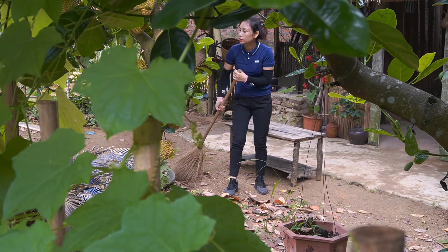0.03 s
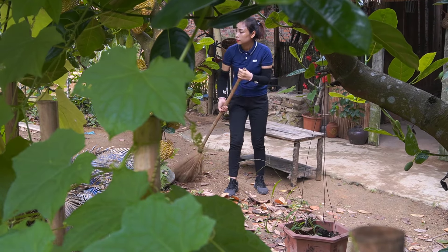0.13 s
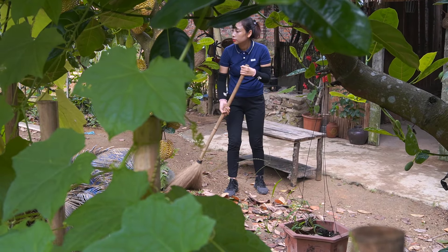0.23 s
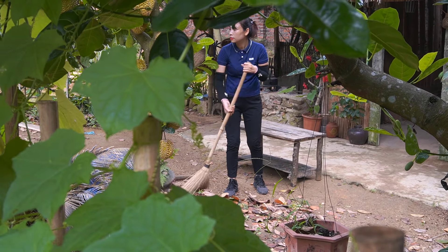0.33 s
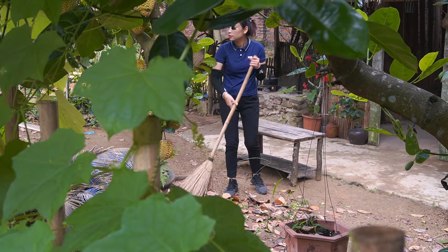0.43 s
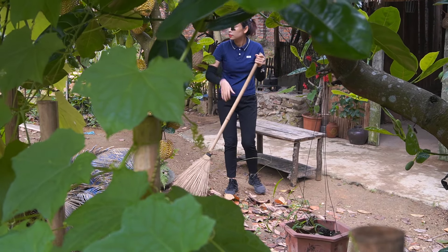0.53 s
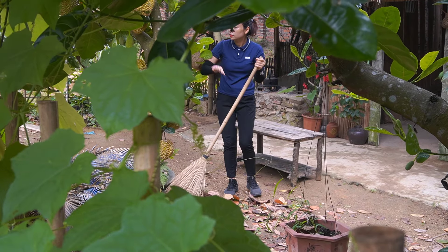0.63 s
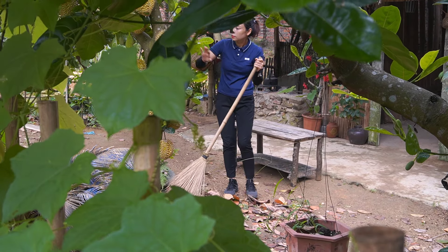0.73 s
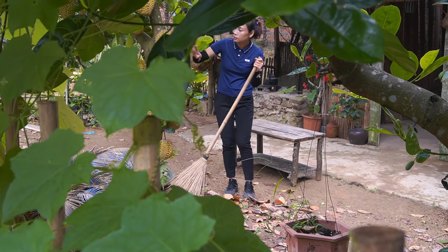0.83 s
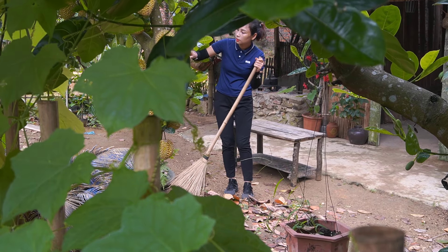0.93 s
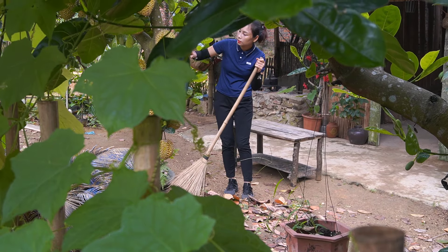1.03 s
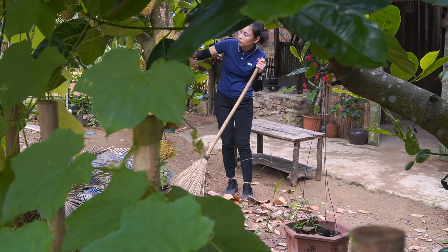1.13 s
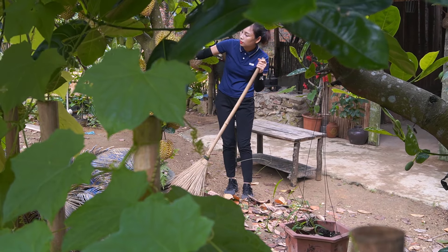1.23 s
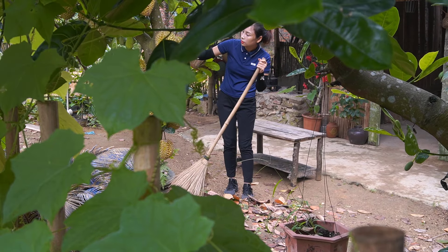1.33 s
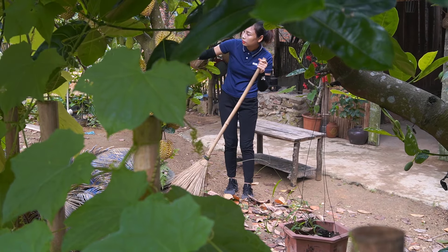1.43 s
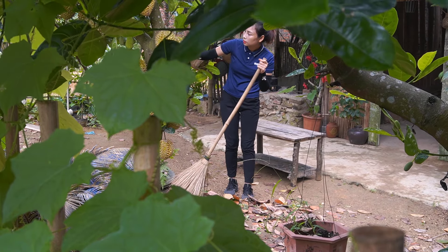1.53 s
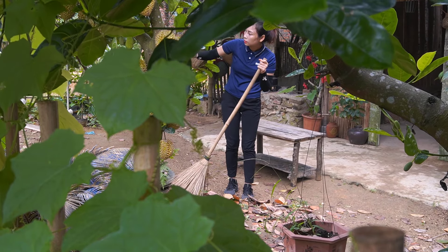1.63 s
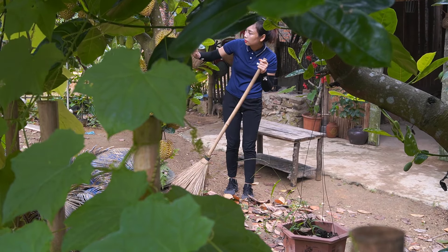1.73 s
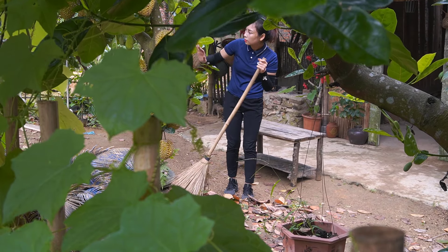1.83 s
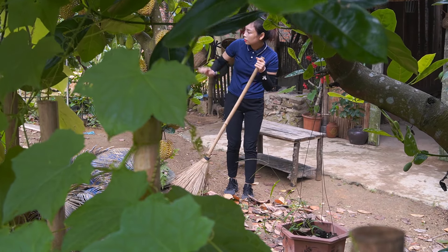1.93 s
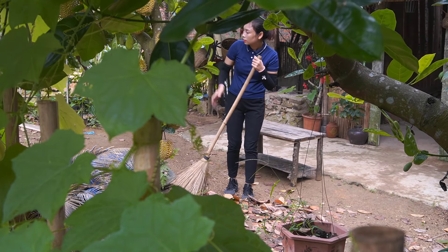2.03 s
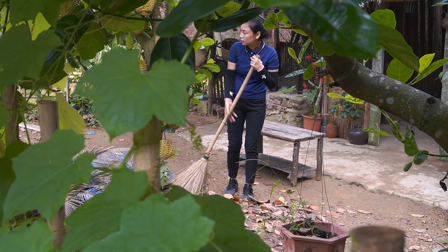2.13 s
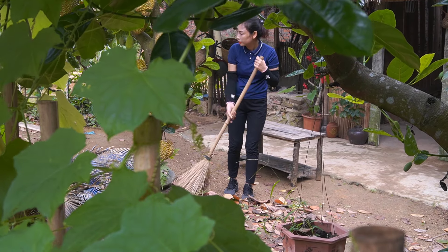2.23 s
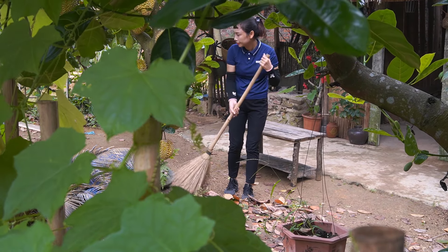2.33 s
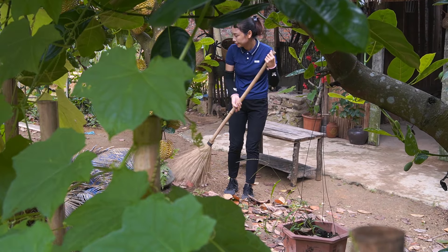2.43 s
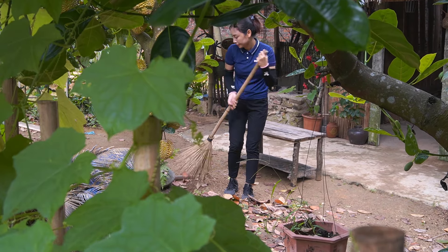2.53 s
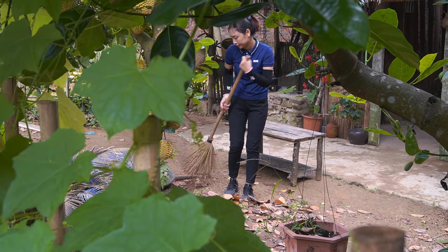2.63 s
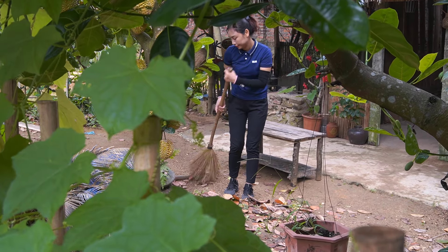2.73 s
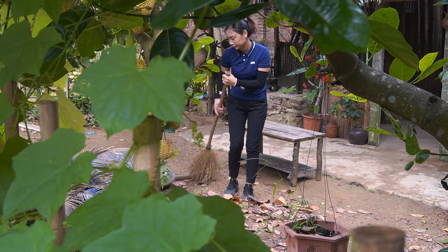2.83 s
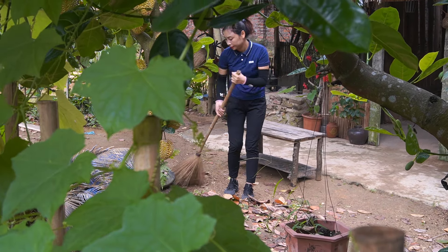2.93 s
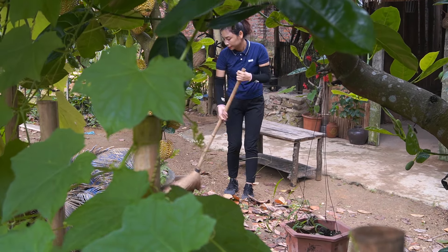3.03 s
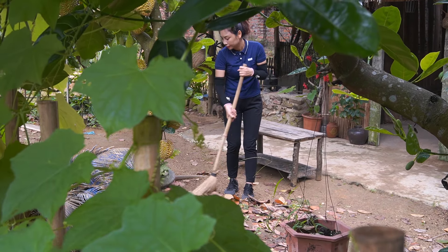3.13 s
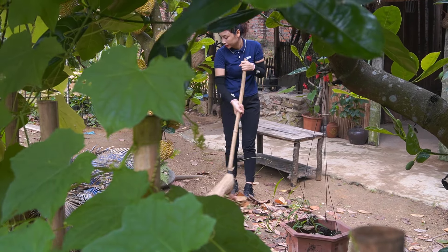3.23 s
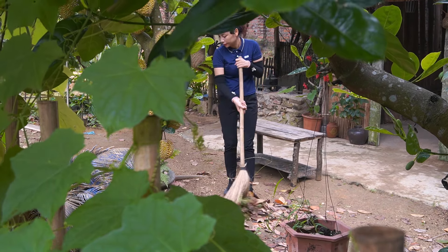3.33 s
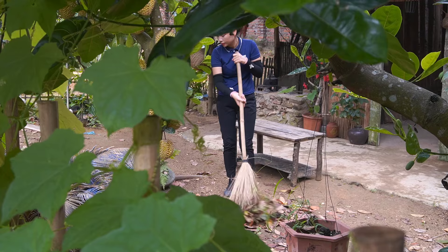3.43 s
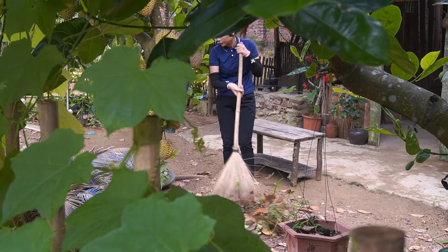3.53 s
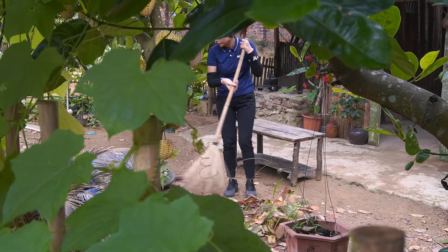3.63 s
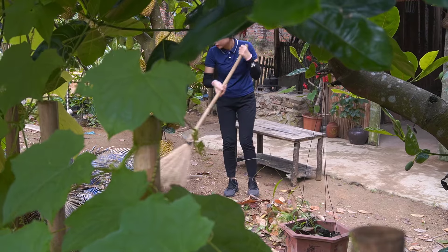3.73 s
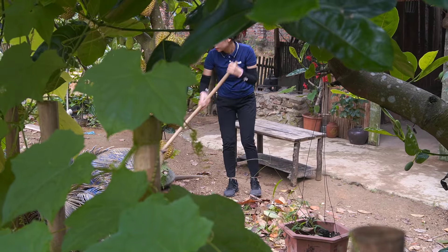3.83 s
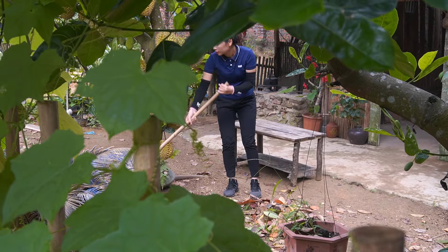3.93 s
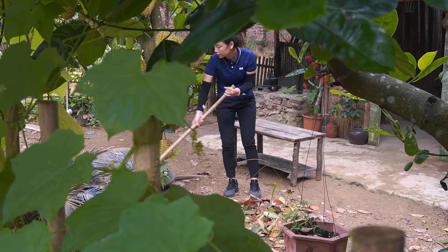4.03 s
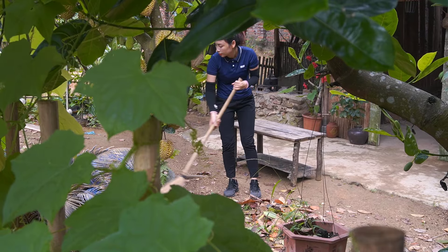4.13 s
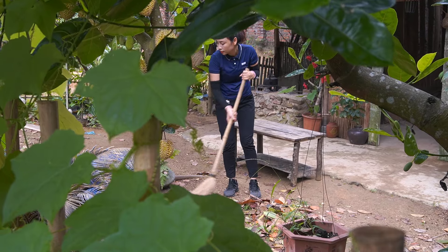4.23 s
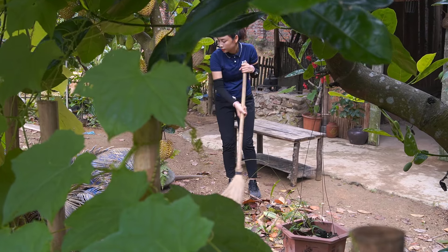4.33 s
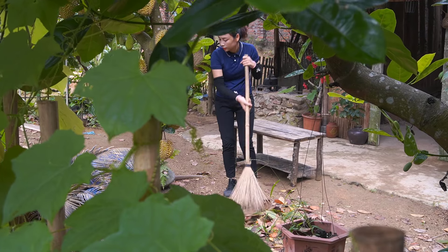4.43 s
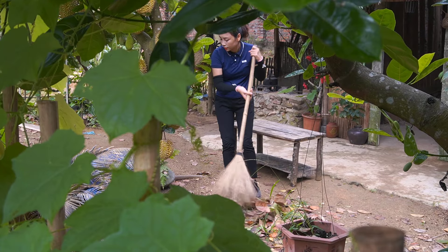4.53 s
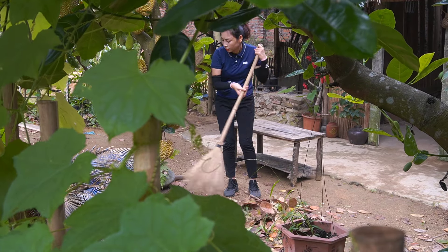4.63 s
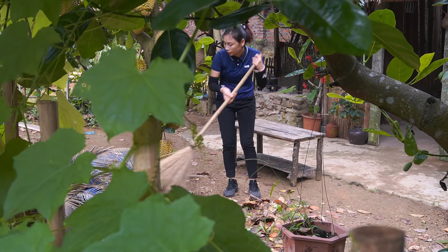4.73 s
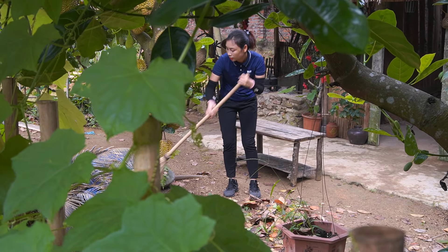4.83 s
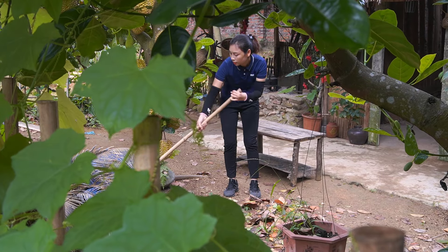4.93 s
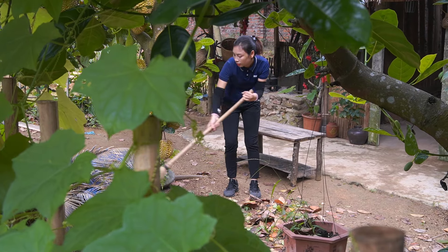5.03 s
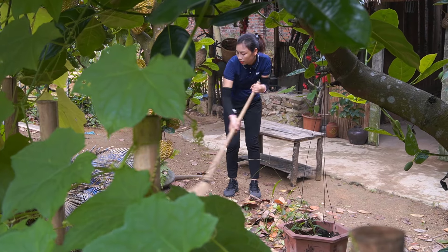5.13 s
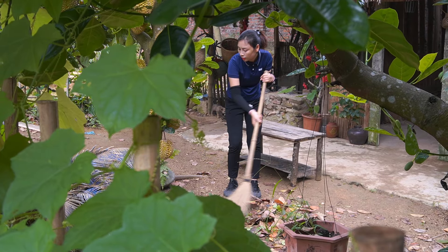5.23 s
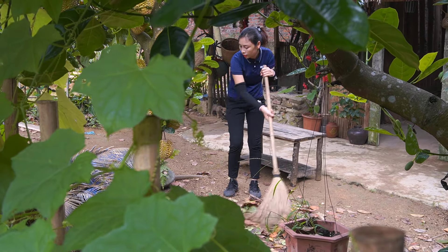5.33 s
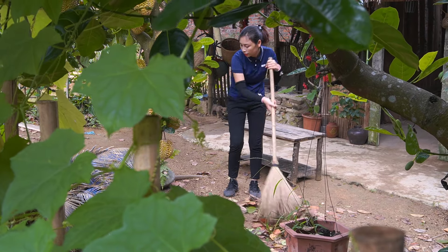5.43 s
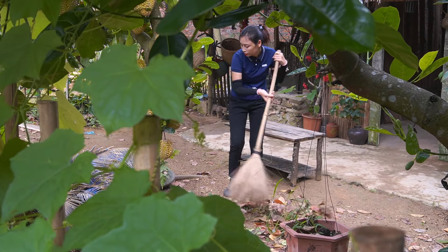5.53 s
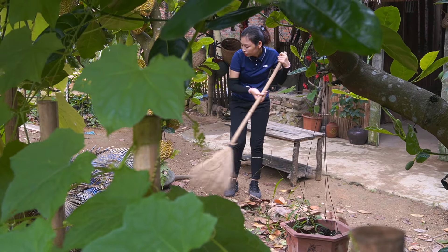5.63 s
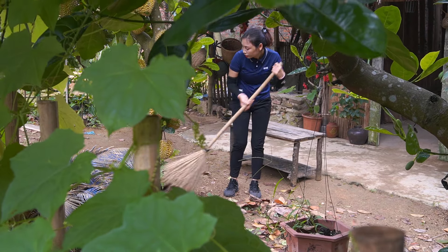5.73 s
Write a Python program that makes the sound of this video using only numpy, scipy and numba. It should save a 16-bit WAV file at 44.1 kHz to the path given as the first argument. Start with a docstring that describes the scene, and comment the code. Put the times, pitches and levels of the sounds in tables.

```python
"""Dry, crackling sweeps of a grass broom over leaves and bare dirt, close by in a garden, in mono.
Each stroke is six bands of random clicks (bristle ticks, leaf crackle) over friction noise.
Behind it, coloured noise and clicks make a cicada chorus, banded grains a faint cricket, short damped
modes the wooden knocks, and noise with low tones the garden air and a far machine's hum.
Gain control ducks everything slightly under the loud strokes."""
import sys
import numpy as np
from scipy import signal
from scipy.fft import rfft, irfft
from scipy.io import wavfile
from scipy.ndimage import uniform_filter1d
from numba import njit

SR = 44100
rng = np.random.default_rng(int(sys.argv[2]) if len(sys.argv) > 2 else 0)


def digitize_waveform(pressure):
    """Quantize a signal to 16-bit integers and store it at the path in sys.argv[1].

    Rows of a 2-D input are taken as channels; values are limited to [-1, 1].
    """
    field = np.atleast_2d(pressure).T
    bounded = np.clip(field, -1, 1)
    quanta = np.round(bounded * 32767).astype(np.int16)
    wavfile.write(sys.argv[1], SR, quanta)


N = 255339
T = np.arange(N) / SR  # time of each sample [s]


def undb(db):
    """Turn dB into an amplitude gain."""
    return 10 ** (np.asarray(db) / 20)


def level(x, db):
    """Scale a signal to an rms level in dB."""
    return x * undb(db) / np.sqrt(np.mean(x ** 2))


def columns(table):
    """Interpolate every column of a time curve to one value a sample."""
    times, *rest = np.transpose(table)
    return [np.interp(T, times, column) for column in rest]


def colour(x, table):
    """Filter causally through (frequency [Hz], gain [dB]) points: minimum phase from the folded cepstrum."""
    size = 16384
    hz, db = np.transpose(table)
    grid_hz = np.maximum(np.arange(size // 2 + 1), 1) * SR / size
    gain_db = np.interp(np.log(grid_hz), np.log(hz), db)
    cepstrum = irfft(np.log(undb(gain_db)))
    cepstrum[1:size // 2] *= 2
    cepstrum[size // 2 + 1:] = 0
    impulse = irfft(np.exp(rfft(cepstrum)))
    return signal.fftconvolve(x, impulse)[:N]


def band(x, lo_hz, hi_hz, order=2):
    """Pass only the band between two frequencies."""
    edges_hz = [lo_hz, min(hi_hz, .45 * SR)]
    return signal.sosfilt(signal.butter(order, edges_hz, "band", fs=SR, output="sos"), x)


def walk(rate):
    """Random wander with spread near 1: values held 1 / rate seconds, smoothed twice."""
    hold = int(SR / rate)
    steps = np.repeat(rng.standard_normal(N // hold + 1), hold)
    return 1.3 * uniform_filter1d(uniform_filter1d(steps, hold), hold)[:N]


def crackle(rate, scatter_db, most=3.9):
    """Clicks at random moments, rate a second; sizes stray up (or down, if negative) by a capped dB."""
    hit = rng.random(N) < rate / SR
    size = np.minimum(rng.exponential(size=N), most)
    swing = np.clip(rng.standard_normal(N), -2, 2)
    return level(hit * undb(scatter_db * size) * swing, 0)


def rings(events, rise_s, t60_s):
    """Sound one damped mode for each (time [s], peak level [dB], pitch [Hz]), swelling before it decays."""
    out, t = np.zeros(N + SR), np.arange(SR // 10) / SR
    shape = (1 - np.exp(-t / rise_s)) ** 2 * np.exp(-np.log(1000) * t / t60_s)
    for s, db, hz in events:
        i = int(s * SR)
        out[i:i + len(t)] += undb(db) * shape / shape.max() * np.sin(2 * np.pi * hz * t)
    return out[:N]


def garden():
    """Air, foliage and far traffic as coloured noise, with a low machine hum and a wavering drone."""
    # tone of the garden air: (frequency [Hz], level per Hz [dB])
    air_spectrum = [(20, -6), (40, -18), (70, -2), (130, -5), (230, -5.5), (300, -8), (500, -13.5),
                    (800, -15), (1400, -13), (2200, -17), (4300, -15.5), (6000, -27.5)]
    hum_hz, drone_hz, drone_width_hz = 30.6, 96, 11
    air = level(colour(rng.standard_normal(N), air_spectrum), -36) * undb(0.2 * walk(6.2))
    hum_phase = 2 * np.pi * np.cumsum(hum_hz * (1 + 0.006 * walk(3.45))) / SR
    hum = level(np.sin(hum_phase), -47.5) * undb(0.46 * walk(3.7))
    # noise in so narrow a band wavers by itself
    drone = band(rng.standard_normal(N), drone_hz - drone_width_hz / 2, drone_hz + drone_width_hz / 2, order=1)
    return air + hum + level(drone, -48.5)


def cicadas(count=12):
    """Tymbals click at their own drifting rates, 7 dB under a noise hiss that blurs them into a chorus."""
    # tone of the chorus: (frequency [Hz], level per Hz [dB])
    chorus_spectrum = [(3600, -40), (4250, -46), (4450, -20), (4950, -11), (5600, -4), (6600, -1.5),
                       (7050, -1.5), (7300, -7.5), (7800, -12.5), (8800, -21.5), (10400, -23.5),
                       (11500, -28.5), (15600, -39)]
    # swell of the chorus: (time [s], level [dB])
    chorus_curve = [(0, -20), (.5, -20.5), (1.5, -21), (2.9, -19.5), (3.6, -20), (4.4, -20.5), (5.79, -20)]
    clicks = np.zeros(N)
    rates = rng.uniform(150, 330, count)  # clicks a second
    for rate, db in zip(rates, 3 * rng.standard_normal(count)):
        turns = np.floor(np.cumsum(rate * (1 + .06 * walk(30)) / SR))
        clicks += undb(db) * np.diff(turns, prepend=0) * rng.standard_normal(N)
    hiss = level(clicks, -7) + rng.standard_normal(N)
    chorus_db = columns(chorus_curve)[0] + 0.28 * walk(24.62)
    return level(colour(hiss, chorus_spectrum), 0) * undb(chorus_db)


def cricket():
    """Faint scratchy chirps in one wing resonance, quick to start and slow to fade."""
    # chirps: (time [s], peak level [dB])
    chirp_list = [(.9, -49), (1.14, -42), (1.48, -42), (1.78, -42.5), (2.07, -43.5), (2.28, -56),
                  (2.68, -41)]
    wing_hz, width_hz = 3240, 350
    rise_s, fade_s = 0.023, 0.2  # exponential time constants
    scrape = band(crackle(3000, scatter_db=-4.5), wing_hz - width_hz / 2, wing_hz + width_hz / 2)
    chirps = 0
    for s, db in chirp_list:
        distance = np.where(T < s, (s - T) / rise_s, (T - s) / fade_s)
        chirps = chirps + undb(db) * np.exp(-distance)
    return level(scrape, 0) * chirps


def knocks():
    """Soft hollow wooden knocks, each one or more strongly damped modes."""
    # modes, close rows belonging to one blow: (time [s], peak level [dB], pitch [Hz])
    knock_modes = [(1.2405, -25.5, 557), (1.2415, -25, 390), (1.263, -27, 345), (1.4455, -17.5, 484),
                   (1.675, -31.5, 460)]
    return rings(knock_modes, rise_s=.012, t60_s=.02)


def landings():
    """The broom head meets the ground and sounds all its damped modes at once."""
    # blows: (time [s], level before the mode's own [dB])
    blows = [(2.787, -23.5), (2.986, -25), (3.941, -29)]
    # modes of the broom head: (frequency [Hz], relative level [dB])
    head_modes = [(333, -4), (650, -1), (850, 2), (1150, -2), (1530, -2)]
    events = [(s, db + mode_db, hz) for s, db in blows for hz, mode_db in head_modes]
    return rings(events, rise_s=.004, t60_s=0.015)


def snaps():
    """Single leaves and twigs snap: very fast, damped modes."""
    # snaps: (time [s], peak level [dB], pitch [Hz])
    snap_list = [(2.788, -26, 3120), (4.893, -30, 1260), (5.646, -29, 1590), (5.758, -26, 3460)]
    return rings(snap_list, rise_s=0.00035, t60_s=0.018)


def rasps():
    """Bundles of bristles scrape in step and pitch the swish for a moment: grains in a narrow band."""
    # rasps: (centre time [s], level at the centre [dB], pitch [Hz], half length [s])
    rasp_list = [(.42, -25, 4000, .05), (3.072, -20, 3860, .06), (4.378, -19.5, 3470, 0.079),
                 (5.224, -26, 3600, 0.045), (5.34, -21.5, 2140, 0.036)]
    half_width = 0.29 / 2  # share of the pitch
    grains = crackle(6000, scatter_db=1.0)
    out = 0
    for s, db, hz, half_s in rasp_list:
        rasp = level(band(grains, hz * (1 - half_width), hz * (1 + half_width)), db)
        out = out + rasp * np.exp(-((T - s) / half_s) ** 2)
    return out


def motion(zone_db, tilt, swish, scrape, rest_db):
    """Gain of one zone: strokes bite, drag, fade and settle; touches are brief bumps; powers add."""
    # sweeps: (landing time [s], bite [s], time down [s], level [dB], change while down [dB],
    # brightness at landing [dB], at lift-off [dB], fade [dB/s], twig swish [dB], dirt scrape [dB])
    stroke_list = [(-.3, .06, 0.28, -27.5, 1.5, 0, 0.48, 135, -0.5, -1),
                   (0.188, 0.084, 0.19, -22.5, 0.5, 4.5, 0, 79, 0, 0),
                   (2.968, 0.076, 0.44, -24.5, 1, 3, -2.1, 25, 0.5, -0.5),
                   (4.132, 0.092, 0.31, -20.5, -1, 0.5, 0.81, 60, -2, -2.5),
                   (5.112, 0.076, 0.32, -27.5, 3.5, 8, 0.59, 72, -1, -1.5)]
    # light bristle touches and brief harder presses within strokes: (time [s], level [dB],
    # brightness [dB], rise [s], fade [s], twig swish [dB])
    touch_list = [(.33, -25, 1, 0.036, 0.035, -7), (0.488, -28, 0.5, 0.058, .04, 1.5),
                  (.95, -45, -7, 0.074, 0.091, 0), (1.22, -39.5, -9, 0.097, 0.099, 2),
                  (2.39, -41, 0, 0.061, 0.12, 6), (2.79, -31, 3, 0.016, 0.043, -1.5),
                  (3.06, -39, 16, 0.025, .05, -16), (3.42, -30, 1, .05, 0.072, -6),
                  (3.52, -32, 0, 0.066, 0.07, -2), (3.75, -31, 2, 0.021, 0.032, -5),
                  (3.82, -35.5, 6, .04, 0.038, -4), (3.945, -31, 3.5, 0.018, 0.043, -0.5),
                  (4.55, -29.5, 0, 0.063, .05, -16), (4.925, -33.5, 3.5, .015, 0.072, 1),
                  (5.33, -28.5, 7.5, .03, 0.055, -3), (5.518, -31.5, -9, .03, 0.034, -3),
                  (5.64, -31, -31, .03, 0.059, -3), (5.74, -34.5, -5.5, 0.046, 0.074, 4)]
    bite_depth_db = 14.5
    # leaves go on settling, starting this far below the stroke or touch
    settle_db, touch_settle_db, settle_db_per_s = -11.5, -11, 25
    power = undb(rest_db) ** 2
    for s, bite_s, down_s, db, change_db, bright0_db, bright1_db, fade, swish_db, scrape_db in stroke_list:
        along = np.clip((T - s) / down_s, 0, 1)
        after = np.maximum(T - s - down_s, 0)
        bite_db = -bite_depth_db * np.clip(1 - (T - s) / bite_s, 0, 4) ** 2
        bright_db = bright0_db + (bright1_db - bright0_db) * along
        timbre_db = zone_db + swish * swish_db + scrape * scrape_db + tilt * bright_db
        drag_db = db + timbre_db + bite_db + change_db * along
        tail = undb(-fade * after) ** 2 + undb(settle_db - settle_db_per_s * after) ** 2
        power = power + undb(drag_db) ** 2 * tail
    for s, db, bright_db, rise_s, fade_s, swish_db in touch_list:
        bump = np.exp(-np.where(T < s, ((T - s) / rise_s) ** 2, 2 * (T - s) / fade_s))
        settling = (T > s) * undb(touch_settle_db - settle_db_per_s * (T - s).clip(0)) ** 2
        touch_db = db + zone_db + tilt * bright_db + swish * swish_db
        power = power + undb(touch_db) ** 2 * (bump + settling)
    return np.sqrt(power)


def broom():
    """Six zones of the sweep, each grains over friction noise; the whole head chatters on the ground."""
    # tone of the sweep: (frequency [Hz], level per Hz [dB])
    sweep_spectrum = [(120, -37), (200, -13.5), (678, -3.5), (925, -6), (1130, -6), (2430, -4), (3700, -2),
                      (8550, -6.5), (15600, -18)]
    # borders of the zones, low to high: (frequency [Hz])
    zone_edges = (150, 900, 2400, 4600, 9000, 12500, 19000)
    # crackle of each zone, low to high: (grains [1/s], size scatter [dB],
    # share of smooth friction noise [0-1], flicker [dB])
    grain_laws = [(1440, 2.5, 0.7, 1.4), (3010, 2.5, 0.74, 1.4), (6070, -0.5, 0.7, -0.2),
                  (7870, 1.5, 0.6, -1.2), (8800, 3, 0.7, 1.2), (9100, 6, 0.7, 1.6)]
    # each zone, low to high: (level against the rustle [dB], tilt [dB per dB of brightness],
    # share of swish [1], share of scrape [1], level at rest [dB])
    zone_laws = [(-6.5, -0.17, 0, 1, -49.5), (0.5, 0.1, 0, 0, -54), (1, 1.2, 1, 0, -47),
                 (3, 1.08, .3, 0, -54), (-3, 1.0, 0, 0.61, -56), (-2.5, 1.4, -0.21, .5, -64)]
    chatter_db = 0.22 * walk(18)
    # dry leaves that break, heard in every zone at once
    cracks = undb(-17) * crackle(120, scatter_db=5)
    out = 0
    for k, law in enumerate(zone_laws):
        rate, scatter_db, smooth, flicker_db = grain_laws[k]
        smooth = np.clip(smooth, 0, 1)
        friction = np.sqrt(smooth) * rng.standard_normal(N)
        grains = np.sqrt(1 - smooth) * crackle(rate, scatter_db)
        raw = friction + grains + cracks
        zone = band(colour(raw, sweep_spectrum), zone_edges[k], zone_edges[k + 1])
        wander_db = chatter_db + flicker_db * walk(25.22)
        out = out + level(zone, 0) * motion(*law) * undb(wander_db)
    return out + rasps() + snaps()


def yard(near):
    """Walls and ground scatter the near sounds into a short, decaying noise tail."""
    t60_s, tail_db = .15, -21
    t = np.arange(SR // 2) / SR
    scatter = rng.standard_normal(len(t)) * np.exp(-np.log(1000) * t / t60_s)
    scatter = scatter * (t > .006)  # the first reflections arrive after 6 ms
    return undb(tail_db) * signal.fftconvolve(near, scatter / np.linalg.norm(scatter))[:N]


def scene():
    """Near sounds with their scatter, and the garden behind, all reach one microphone."""
    near = broom() + knocks() + landings()
    mono = near + yard(near) + cicadas() + cricket() + garden()
    return np.array([mono, mono])


@njit
def follow(x, attack, release):
    """Smooth a level with separate rise and fall rates, as a gain control's detector does."""
    e, out = x[0], np.empty(len(x))
    for i in range(len(x)):
        e += (x[i] - e) * (attack if x[i] > e else release)
        out[i] = e
    return out


def record(dry):
    """Gain control turns loud passages down a little, high peaks are rounded, the top is cut steeply."""
    threshold_db, ratio, attack_s, release_s = -22.5, 1.18, 0.0077, 0.075
    top_hz = 15650
    short_power = uniform_filter1d(dry[0] ** 2, size=441)  # 10 ms mean
    power = follow(short_power, 1 / (attack_s * SR), 1 / (release_s * SR))
    headroom = np.minimum(undb(threshold_db) / np.sqrt(power + 1e-12), 1)
    gain = headroom ** (1 - 1 / max(ratio, 1))
    rounded = np.tanh(dry * gain / 1.3) * 1.3
    return signal.sosfilt(signal.ellip(14, .2, 100, top_hz, fs=SR, output="sos"), rounded)


dry = scene()
out = record(dry)
digitize_waveform(out)
```